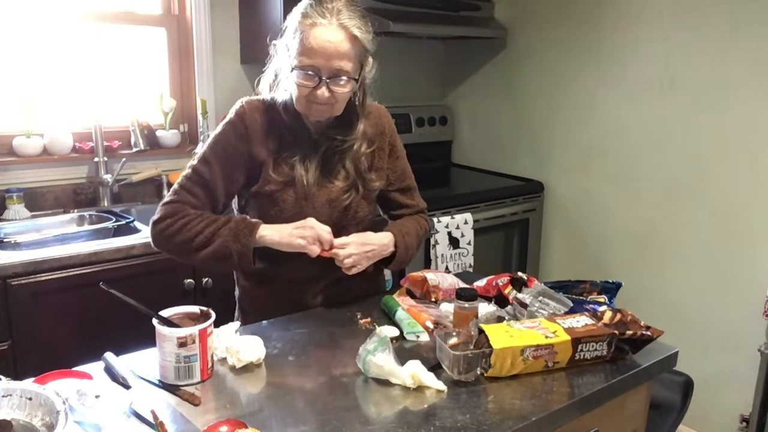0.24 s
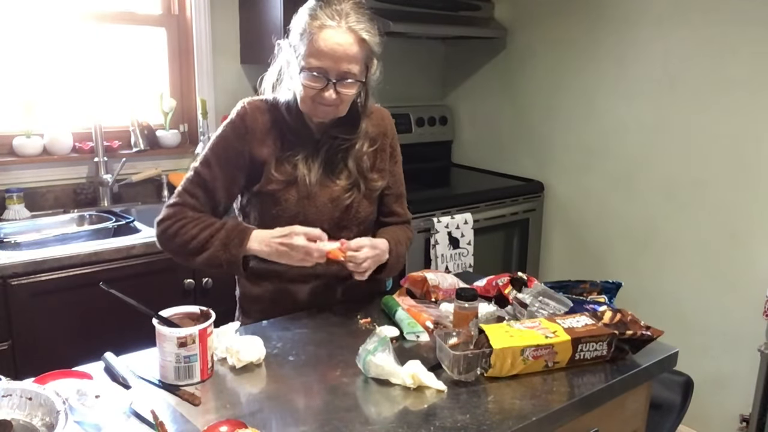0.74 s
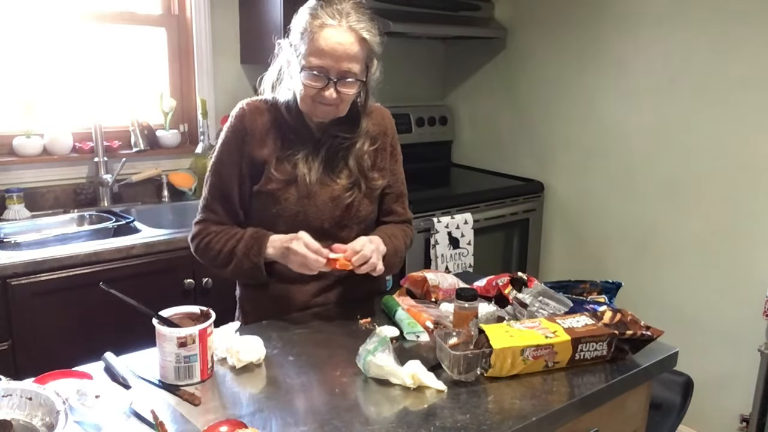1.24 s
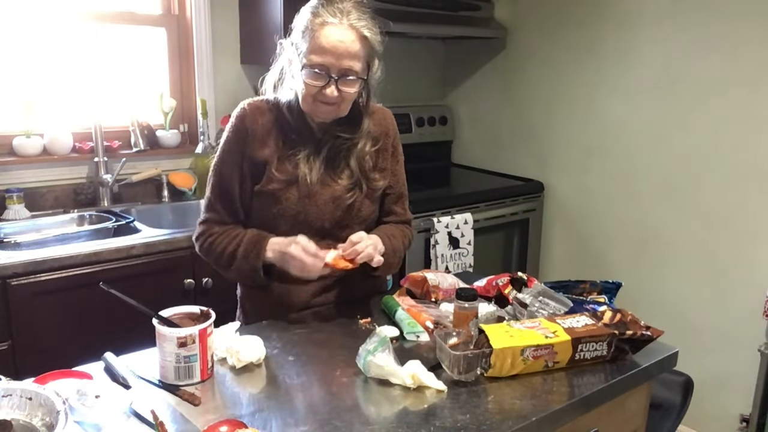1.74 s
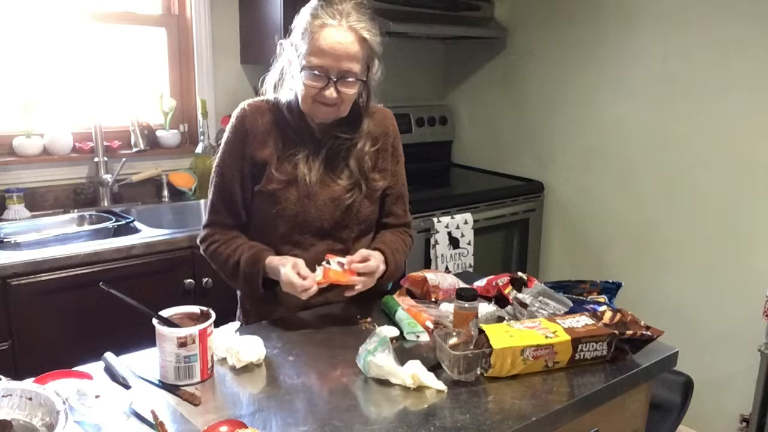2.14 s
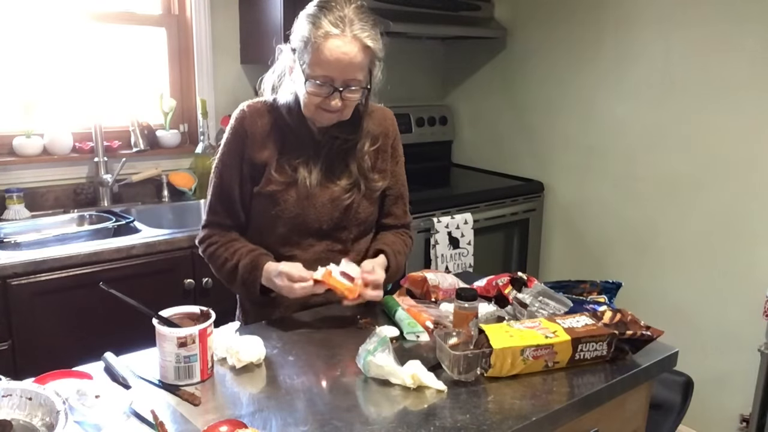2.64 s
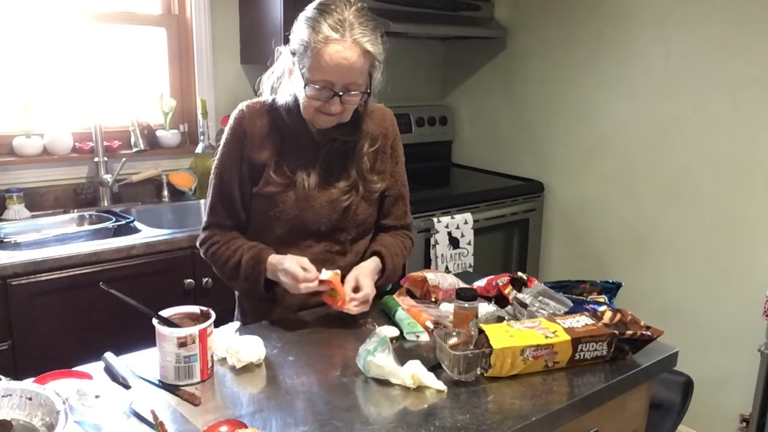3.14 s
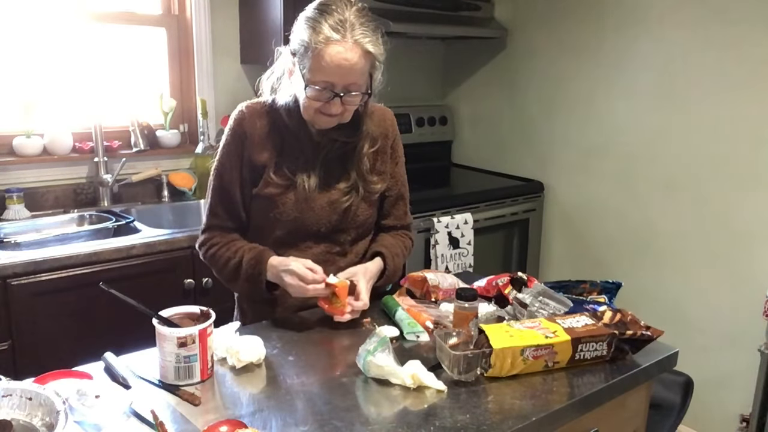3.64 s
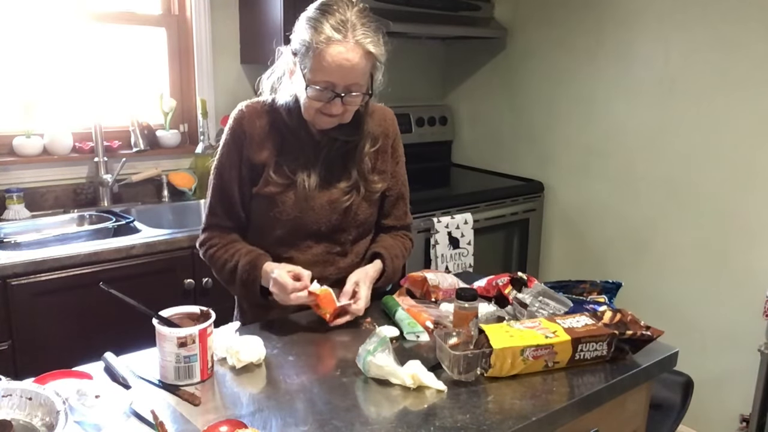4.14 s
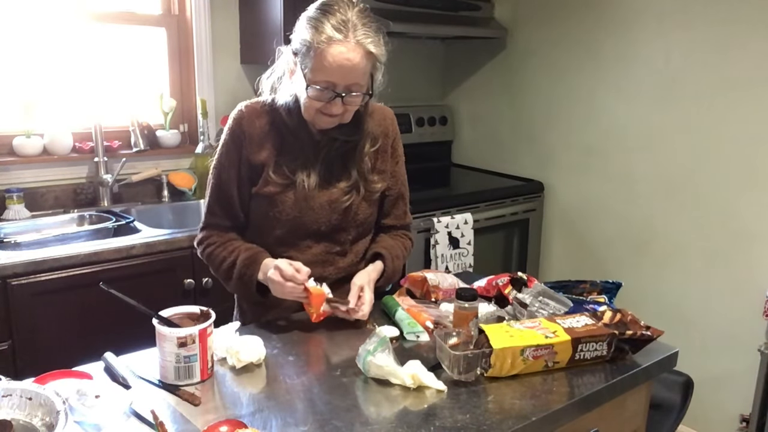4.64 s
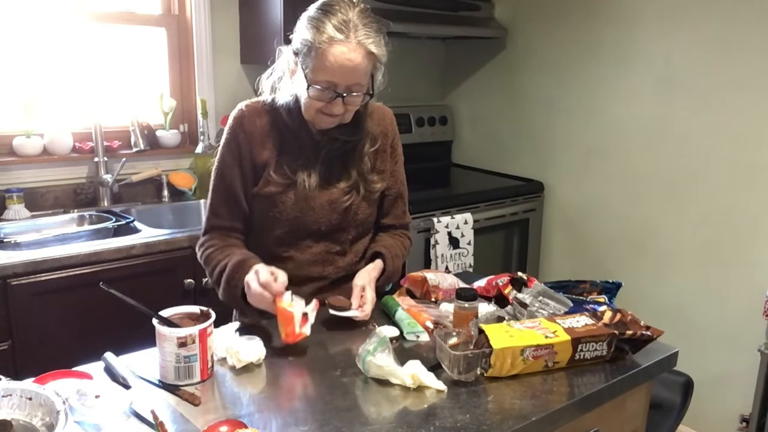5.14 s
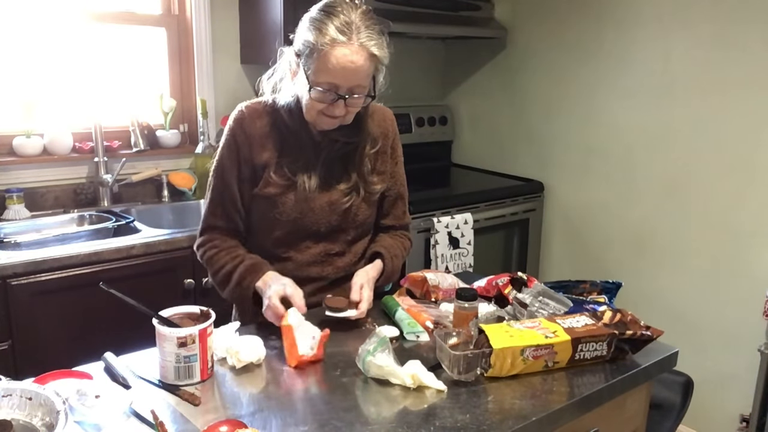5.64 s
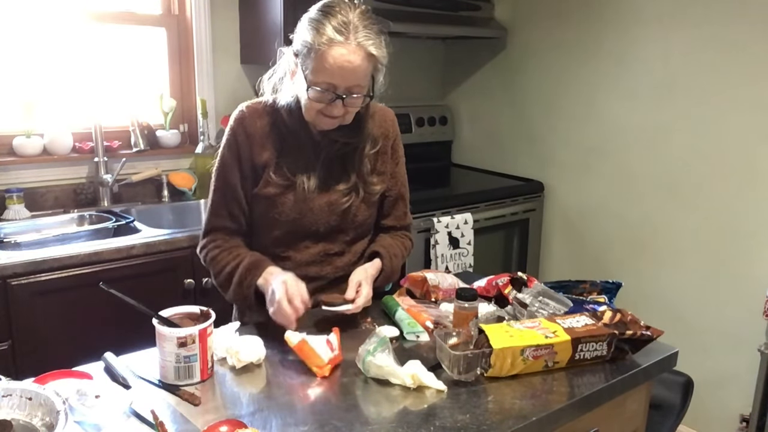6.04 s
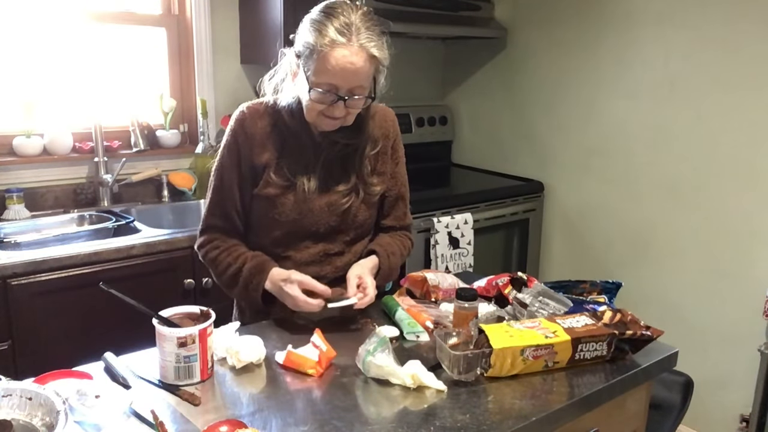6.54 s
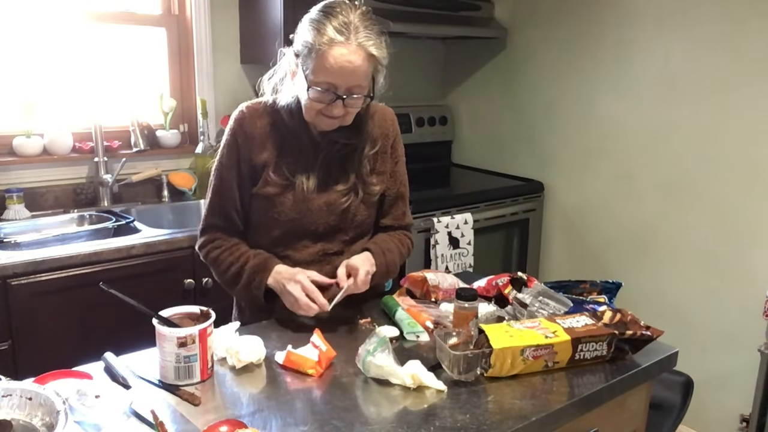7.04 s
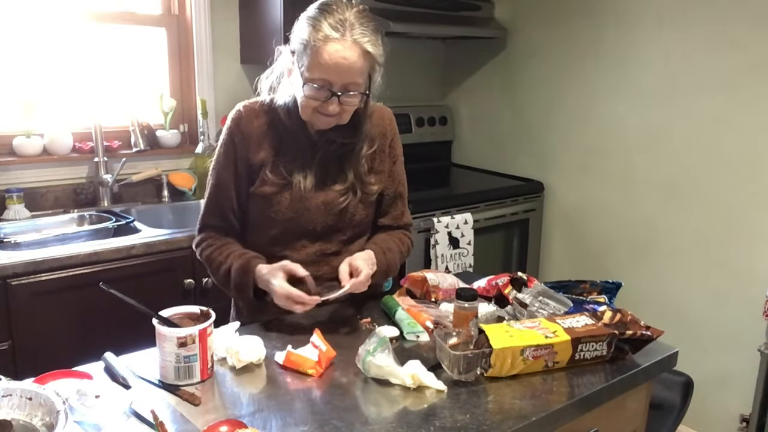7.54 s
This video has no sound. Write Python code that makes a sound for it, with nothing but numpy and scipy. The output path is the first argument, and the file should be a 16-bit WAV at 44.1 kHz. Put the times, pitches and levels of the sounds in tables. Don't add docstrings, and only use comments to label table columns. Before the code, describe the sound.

In a quiet, hard-surfaced kitchen, hands work a thin plastic wrapper over a stone counter. From 0 to 1 s, crisp irregular snaps over fine rustle bunch most tightly around 0.4-0.5 s. Tearing follows, with sharp ticks near 1.15 and 1.3, a very faint soft thump near 1.5, and the loudest crack at about 1.65 with a short dull knock. Unfolding brings dense crinkles at 2.0-2.1 and a stronger flurry at 2.2-2.4, then scattered snaps. From 3 to 4.7 s, picking and prying is softer, with finger rub, a barely audible squeak and wooden creak around 4, and small low knocks. After 4.8 s it thins to faint papery ticks with gaps, small touches near 5.3, 6.2 and 6.6, and a brighter crackle burst at 7.2-7.35 before fading. Short reflections, low fridge hum and faint hiss continue throughout.

```python
import sys
import numpy as np
from scipy import signal
from scipy.fft import rfft, irfft, next_fast_len
from scipy.io import wavfile
from scipy.ndimage import map_coordinates

SR = 44100
rng = np.random.default_rng(int(sys.argv[2]) if len(sys.argv) > 2 else 0)


def voltage_ratio(level):
    return 10 ** (np.asarray(level, float) / 20)


def pcm_store(signal):
    levels = np.round(np.clip(np.atleast_2d(signal), -1, 1) * 32767)
    wavfile.write(sys.argv[1], SR, levels.astype(np.int16).T)


N = 344068

# (time [s], level [dB], panel pitch [Hz], low flap [dB], sizzle [dB])
CREASE_SNAPS = [(0.0383, -46.5, 5210, -27, -4), (0.0594, -41.5, 4000, -4.5, -16),
                (0.0768, -43.5, 3200, -2.5, -22), (0.1569, -40, 6440, -18, -4), (0.2577, -43, 6780, -28, 0),
                (0.264, -37, 5060, -10, -15), (0.305, -47, 6780, -5, 0), (0.324, -48, 6780, -14, 7),
                (0.3417, -45, 6780, -19, 8.5), (0.353, -44, 4030, -17, -12), (0.3686, -44, 3140, -16, -10),
                (0.38, -28, 4050, -31, -12), (0.3936, -34.5, 3600, -10, -16), (0.409, -42, 4280, -19, -9.5),
                (0.4288, -30, 3880, -8.5, -4.5), (0.4354, -37, 6120, -5, -4), (0.444, -49, 6780, -6, -5),
                (0.4633, -34, 6840, -27, -5), (0.4797, -27.5, 5340, -19, -5), (0.4874, -28.5, 3760, -24, -11),
                (0.5381, -47, 3360, -1.5, -14), (0.6568, -34.5, 4130, -14, -2.5), (0.67, -37, 2530, -15, -7),
                (0.704, -34.5, 4000, -12.5, -17), (0.7324, -41.5, 3060, -20, -1), (0.7471, -49, 2780, -14, 0),
                (0.8569, -44.5, 3530, -2.5, -12), (0.8938, -53, 6480, -18, -12), (0.9176, -41, 6650, -34, 6),
                (0.92, -51, 5230, -23, -2), (0.9276, -43.5, 2960, -14, -3), (0.9906, -36.5, 5320, -36, -6),
                (1.003, -39.5, 3430, -22, -11), (1.041, -46.5, 3700, -19, -16), (1.069, -45.5, 6460, -21, -7),
                (1.0824, -48, 3680, -21, 1),
                (1.1409, -26.5, 4090, -37, -6.5), (1.152, -46, 4390, -28, -1), (1.1555, -49, 4500, -32, -12),
              (1.1855, -35, 6780, -21, -7), (1.197, -43, 6780, -24, -2), (1.2613, -46, 3230, -10.5, -15),
              (1.2819, -25.5, 4130, -25, -19), (1.2935, -45, 3850, -25, -11),
              (1.3413, -41, 5280, -17, -12.5), (1.3614, -32, 3230, -11, -0.5),
              (1.3808, -31, 6780, -16, -1.5), (1.3918, -39.5, 4240, -11.5, 0), (1.421, -50, 3210, -19, -8),
              (1.433, -38.5, 4310, -26.5, -3.5), (1.4548, -40, 6780, -25, -1),
              (1.5199, -35, 3170, -13.5, -5), (1.5246, -36.5, 5190, -28, 4), (1.5568, -39, 5940, -30, -7.5),
              (1.56, -41, 5730, -25, -8), (1.565, -38.5, 6370, -29.5, -1),
              (1.6132, -40.5, 5280, -15, -11.5), (1.6266, -41, 4260, -28, -11.5),
              (1.6452, -12, 3340, -16.5, -11.5), (1.6557, -35, 3920, -6, -8), (1.6695, -39, 3320, -22, 5),
              (1.6932, -30, 3750, -29, -9), (1.701, -32, 3700, -21, -15), (1.7141, -26.5, 3380, -19, -19),
              (1.8306, -35, 3320, -27, -37), (1.8547, -41, 3290, -19, -7), (1.879, -37.5, 5120, -24, -15),
              (1.9063, -45.5, 6330, -13, -9),
                (1.9688, -59, 5680, -17, 1), (1.9925, -36.5, 3570, -27, -17.5),
                (1.9958, -33.5, 5320, -16, -12), (2.003, -28.5, 4030, -25, -12),
                (2.0356, -29.5, 4270, -14.5, -5), (2.0403, -31.5, 7000, -19, -1.5),
                (2.0441, -38, 4220, -25, -8.5), (2.0515, -37.5, 3320, -14, 1),
                (2.0653, -35, 3270, -7.5, -9.5), (2.0743, -34.5, 3190, -14, -1),
                (2.178, -56, 3190, -11, -12), (2.199, -58, 5880, -10, -3), (2.2064, -57, 6570, -10, 0),
                (2.212, -46, 5450, -17, -12), (2.2256, -31.5, 4080, -25, -9),
                (2.2296, -21.5, 4230, -21, -4.5), (2.236, -25, 5280, -26, 0), (2.2456, -29.5, 3450, -10, 1),
                (2.2562, -29, 3170, -21, -5), (2.2602, -29.5, 4090, -20, -14),
                (2.2774, -33.5, 3170, -15, -13.5), (2.324, -28, 3630, -23, -5.5),
                (2.337, -42.5, 4050, -25, -11), (2.3632, -37, 6300, -26, -10), (2.401, -38, 3320, -12, -16),
                (2.4111, -32.5, 4330, -17, -30), (2.421, -44, 4220, -8, -12), (2.548, -46, 5160, -28, -5),
                (2.5632, -46, 6780, -12, -7), (2.5712, -50, 5400, -22, -3), (2.596, -28, 4940, -31, -13),
                (2.6064, -49, 4410, -14, -10), (2.6338, -48, 4200, -18, -16),
                (2.6573, -39.5, 4050, -8, -24), (2.665, -40, 3470, -13, -23), (2.668, -41, 3510, -18, -19),
                (2.8606, -51, 6780, -3, -1), (2.8873, -35, 4200, -6, -6.5), (2.8883, -41, 4060, -27, -1),
                (2.8983, -46, 3730, -14, 2),
                (3.056, -40.5, 3940, -10.5, -2.5), (3.107, -45, 3250, -13, -15),
              (3.1208, -41, 2600, -3.5, -15), (3.137, -40, 6050, -19, -10), (3.1588, -42, 3010, -9, -7),
              (3.178, -42, 5470, -15, -4), (3.2123, -50, 6680, -19, 4), (3.2505, -43.5, 6860, -13, -5),
              (3.2957, -57, 3270, -22, 9), (3.3046, -58, 6780, -22, 8), (3.3383, -55, 6780, -24, 6),
              (3.3486, -42, 4370, -18, -1), (3.391, -44, 3250, -11, 0), (3.3938, -45.5, 4100, -4, -5),
              (3.3987, -38.5, 3400, -19, -19), (3.4321, -45.5, 3600, -4, -14),
              (3.5367, -36.5, 2980, -30, -4.5), (3.5396, -39, 4140, -33, -18),
              (3.5527, -40.5, 4580, -31, -16), (3.588, -39.5, 6780, -15, -11), (3.6015, -42, 6780, -15, -5),
              (3.6122, -32.5, 5100, -8.5, -10), (3.684, -38, 6780, -7.5, -7), (3.6906, -42, 6400, -6.5, 1),
              (3.6943, -45, 3100, -4, -6), (3.803, -37.5, 3040, -29, 0), (3.813, -48, 3000, -23, -1),
              (3.8459, -42, 3200, -23, -16),
                (3.878, -47, 3080, -17, -14), (3.903, -46, 4090, -8, -6), (3.9238, -38, 6630, -7, -5),
             (3.941, -48, 5060, -14, -8), (4.0255, -44.5, 2610, -4, -17), (4.0665, -49, 2950, -5.5, -14),
             (4.138, -42.5, 4030, -24, -11), (4.143, -44, 3980, -20, -11), (4.194, -41.5, 5170, -9, 3),
             (4.2049, -52, 5210, -8, -5), (4.287, -35.5, 2540, -17.5, -6.5), (4.29, -47, 3270, -16, -11),
             (4.2967, -51, 3620, -14, -8), (4.3895, -61, 5190, -19, -4), (4.4048, -41.5, 2970, -26, -10),
             (4.4195, -50, 6440, -18, -9), (4.436, -53, 2610, -10, -3), (4.481, -43, 2950, -9, -12),
             (4.4933, -62, 5620, -12, -13), (4.52, -50, 5210, -9, -1), (4.5349, -57, 6780, -15, 0),
             (4.541, -50, 5060, -15, 1), (4.5724, -36, 6780, -13, 3.5), (4.5827, -42, 6780, -7, 1),
             (4.612, -58, 6780, -10, -1), (4.629, -42, 2610, -1, 0), (4.633, -32, 2970, -10.5, -1),
             (4.6514, -45, 2600, -20, -3),
                (4.759, -51, 5120, -14, -10), (4.851, -44, 5400, -20, -8), (4.8593, -49, 3140, -10, 2),
              (5.0776, -53.5, 6780, -5, -8), (5.1788, -58, 4260, -17, 4.5), (5.2125, -57, 4180, -5, -10),
              (5.2502, -47, 4390, 1, -4), (5.2583, -36, 4100, -22, -24), (5.2724, -41, 3800, -26, -22),
              (5.356, -42.5, 2950, -1.5, -11), (5.3745, -50, 2910, -3, -15),
              (5.5471, -42.5, 6700, -15, -6.5), (5.662, -45, 4220, -12, -6.5),
              (6.1593, -42.5, 5030, -24.5, 0), (6.1627, -56, 6460, -14, -2), (6.1698, -53.5, 4590, -14, 5),
              (6.3262, -60, 6780, -13, -4), (6.4006, -56, 6370, -11, 3), (6.4104, -56, 2860, -8, 2),
              (6.4525, -44, 6780, -23, -0.5), (6.4562, -54, 6240, -15, 2), (6.4635, -60, 6780, -6, -2),
              (6.5836, -55, 6780, -8, -5), (6.6114, -37, 5500, -19, -2), (6.9548, -52.5, 6400, -13, 2),
              (7.0948, -49, 6360, -26, -7), (7.0985, -57, 6400, -14, -4), (7.12, -49, 5200, -15, -1),
              (7.155, -47.5, 3140, -26, -11), (7.1674, -35, 6100, -23, -11), (7.1768, -54, 6780, -20, -9),
              (7.267, -35.5, 3100, -11.5, -14), (7.2783, -37.5, 6330, -19, -8), (7.2818, -42, 2860, -16, 1),
              (7.3053, -31.5, 6100, -17.5, -3.5), (7.3149, -35, 4070, -20, -10),
              (7.3572, -46.5, 3250, -22, -11), (7.5213, -56, 4870, -22, -16), (7.6222, -59, 6260, -13, -5),
              (7.6348, -54, 6160, -16, -10),
                (4.53, -40.5, 2500, -4, -2),
    (4.569, -42, 2200, -4, -7),
    (2.5958, -32, 3570, -26, -25),
    (7.3053, -35, 3100, -10.5, -14),
    (.2627, -43, 3200, -2.5, -20),
    (6.8, -54, 4200, -10, 1),
    (7.5, -56.5, 5200, -15, -0.5),
]

# (peak time [s], crackle [dB], swell time [s], finger rub over crackle [dB])
PULLS = [(.07, -51, 0.17, -16), (.36, -39.5, 0.087, -19), (.48, -45.5, 0.34, -16.5), (.73, -53, 0.37, -18),
         (.93, -51.5, 0.068, -22), (1.15, -55, 0.87, -20), (1.38, -43.5, 0.21, -23),
         (1.52, -47, 0.096, -35), (1.66, -34.5, 0.038, -15.5), (2.0, -43.5, 0.022, -16),
         (2.06, -44.5, 0.1, -14), (2.25, -34.5, 0.036, -16.5), (2.61, -48, 0.055, -11),
         (2.9, -47.5, 0.12, -11.5), (3.13, -42, 0.071, -16.5), (3.41, -52, 0.2, -8.5),
         (3.62, -47, 0.083, -18), (3.77, -64, 0.81, -9.5), (3.94, -48, 0.4, -12.5), (4.1, -58, 0.78, -5.5),
         (4.3, -53.5, 0.42, -9.5), (4.425, -48, 0.065, -9), (4.485, -49.5, 0.15, -3.5),
         (4.58, -45, 0.085, -16), (4.86, -60, 0.11, -4.5)]
# (peak time [s], crackle [dB], swell time [s], finger rub over crackle [dB])
TOUCHES = [(5.27, -57, 0.033, -19), (5.33, -62.5, 0.21, -17), (5.38, -58, 0.087, -3.5),
           (5.56, -59, 0.14, -22), (5.66, -60, .2, -13), (5.75, -52.5, 0.072, -13),
           (6.17, -53, 0.016, -14.5), (6.35, -67, 0.23, -10), (6.47, -58.5, 0.18, -13),
           (6.62, -53.5, 0.072, -35), (6.77, -58.5, 0.11, -16), (6.96, -55.5, 0.061, -19),
           (7.18, -52.5, .07, -24), (7.315, -43.5, 0.04, -20), (7.37, -55.5, .08, -10),
           (7.56, -55.5, 0.1, -9), (7.635, -61, 0.047, -9), (7.77, -61, 0.067, -29)]
# (time [s], share [0-1])
PAPER_SHARE = [
    (0, 0.76),
    (5.5, 0.41),
    (5.7, 0.84),
    (7.8, 0.7),
]
# (frequency [Hz], level per Hz [dB])
FILM_TONE = [(700, -35), (1300, 1), (3500, -3), (5000, -2.5), (8000, -2.5), (12500, -18.5), (15500, -31)]
# (frequency [Hz], level per Hz [dB])
PAPER_TONE = [(700, -27), (2000, -6.5), (6000, -6), (11000, -4.5), (15500, -13.5)]
# (frequency [Hz], level per Hz [dB])
HAND_TONE = [(180, -18), (330, -5), (800, 0), (1500, -1.5), (2600, -13), (4500, -30)]
# (middle [s], half length [s], pitch [Hz], width [Hz], level [dB])
SQUEAK = (4.1, .09, 5150, 350, -67)

# (frequency [Hz], time to fall 60 dB [s])
KITCHEN_RING = [(200, 0.23), (2000, 0.21), (6000, 0.33), (14000, 0.26)]
# (delay [s], level [dB])
WALL_ECHOES = [(.0042, -15), (.0115, -16), (.016, -19), (.023, -19)]
# (delay [s], level [dB], spread as the hands move [share of delay])
COUNTER_BOUNCE = (.00091, -3, .015)

# (time [s], level [dB])
THUMP = [
    (1.41, -78),
    (1.465, -55),
    (1.52, -57),
    (1.62, -61),
    (1.75, -78),
]
# (time [s], pitch [Hz], level [dB])
CREAK = [
    (3.93, 276, -78),
    (3.968, 268, -59),
    (4.005, 270, -63),
    (4.07, 275, -65),
    (4.11, 280, -59),
    (4.2, 281, -65),
]
# (time [s], pitch [Hz], level [dB], time to fall 60 dB [s])
KNOCKS = [
    (1.46, 127, -55, 0.19),
    (4.013, 417, -48.5, 0.13),
    (4.022, 726, -49, 0.099),
    (4.055, 253, -38.5, 0.037),
    (4.571, 196, -49, 0.11),
    (1.646, 573, -31, 0.034),
    (1.649, 398, -42, 0.16),
    (2.074, 470, -44, 0.033),
]
# (frequency [Hz], level per Hz [dB])
AIR_TONE = [(24, -48), (40, -13.5), (158, -6.5), (213, -12), (452, -21), (802, -26), (956, -26),
            (1830, -26), (6230, -31.5), (6880, -28), (15700, -37)]
# (pitch [Hz], width [Hz], level [dB])
FRIDGE_HUM = [
    (155, 4, 0),
    (112, 16, -11),
    (75, 16, -11),
]


def snaps(count):
    events = CREASE_SNAPS
    start, db, hz, low_db, high_db = np.transpose(events)[:, :, None]
    t = np.arange(400) / SR

    def jerk(share, t60):
        aftershocks = rng.standard_normal((len(start), len(t))) * t / t60 * voltage_ratio(-60 * t / t60)
        return (t == t[16]) + share * aftershocks

    def same_energy(x):
        return x / np.linalg.norm(x, axis=1, keepdims=True)

    panel = filtered(jerk(2, 0.004), lambda f: resonance(f, hz, 1800) ** 2 + 0.45 * resonance(f, 4070, 3600))
    flap = filtered(jerk(1.5, 0.005), lambda f: resonance(f, 900, 2100) ** 2)
    sizzle = filtered(jerk(5, 0.0055), lambda f: resonance(f, 9000, 10000) ** 2)
    shapes = same_energy(panel)
    shapes = shapes + voltage_ratio(low_db + 7.5) * same_energy(flap)
    shapes = shapes + voltage_ratio(high_db + 4.5) * same_energy(sizzle)
    shapes = voltage_ratio(db + 12.5) * shapes
    out = np.zeros((count, N + len(t)))
    for k, shape in enumerate(shapes):
        first = round(start[k, 0] * SR)
        out[k % count, first:first + len(t)] += shape
    return out[:, :N]


def rustle():
    crackle_gain = effort(rest_db=-72)
    rub_gain = effort(rest_db=-75.5, fades=0.77, rub=0.98)
    share = np.clip(curves(PAPER_SHARE)[0], 0, 1)
    sizes = voltage_ratio(3.5 * np.minimum(rng.exponential(size=N), 2))
    ticks = (rng.random(N) < 1400 / SR) * sizes
    grains = signal.lfilter([1], [1, -0.93], ticks) * rng.standard_normal(N)
    clumps = voltage_ratio(2.6 * wobble(70))
    creases = (unit(grains) + 0.5 * rng.standard_normal(N)) * clumps
    film = toned(creases, FILM_TONE)
    paper = toned(creases, PAPER_TONE)
    hand = toned(rng.standard_normal(N) * voltage_ratio(4.5 * wobble(60)), HAND_TONE)
    crackle = (1 - share) * film + share * paper
    return voltage_ratio(-5) * crackle_gain * crackle + rub_gain * hand


def effort(rest_db, **how):
    pulls = strokes(PULLS, fade_db_per_s=123, **how)
    touches = strokes(TOUCHES, fade_db_per_s=300, **how)
    return np.sqrt(pulls + touches + voltage_ratio(2 * rest_db))


def strokes(rows, fade_db_per_s, fades=1, rub=0):
    peak, db, swell, rub_db = np.transpose(rows)[:, :, None]
    samples = np.arange(0, N + 63, 64)
    age = samples / SR - peak
    shape_db = np.where(age < 0, 19.5 * age / swell, -fades * fade_db_per_s * age)
    power = np.sum(voltage_ratio(2 * (db + rub * rub_db + shape_db)), axis=0)
    return np.interp(np.arange(N), samples, power)


def squeak():
    middle, half, hz, width_hz, db = SQUEAK
    hiss = unit(filtered(rng.standard_normal(N), lambda f: resonance(f, hz, width_hz) ** 2))
    return voltage_ratio(db) * np.exp(-((np.arange(N) / SR - middle) / half) ** 4) * hiss


def kitchen(rows, wet_db):
    count = len(rows)
    every = np.arange(count)
    hz, t, z = signal.stft(rng.standard_normal((count, SR // 2)), SR, nperseg=256)
    fading = voltage_ratio(-60 * t / along(KITCHEN_RING, hz)[:, None])
    tail = signal.istft(z * fading, SR, nperseg=256)[1]
    tail = tail * (1 - 0.7 * np.exp(-(np.arange(tail.shape[1]) / SR / 0.005) ** 3))
    answer = voltage_ratio(wet_db) * tail / np.linalg.norm(tail, axis=1, keepdims=True)
    answer[:, 0] = 1

    def moved(delay, spread):
        return np.round(delay * SR * (1 + spread * rng.standard_normal(count))).astype(int)

    delay, db, spread = COUNTER_BOUNCE
    bounce = moved(delay, spread)
    answer[every[:-1], bounce[:-1]] += voltage_ratio(db)
    answer[-1, bounce[-1]] += voltage_ratio(db - 17.5)
    for delay, db in WALL_ECHOES:
        answer[every, moved(delay, 0.072)] += voltage_ratio(db)
    return signal.fftconvolve(rows, answer, axes=1)[:, :N].sum(axis=0)


def furniture():
    t = np.arange(N) / SR

    def body(f):
        return resonance(f, 130, 150) ** 2 + 0.5 * resonance(f, 255, 40) ** 2 + 0.9 * resonance(f, 80, 45)

    thud = unit(filtered(rng.standard_normal(N), body))
    hz, db = curves(CREAK)
    sounding = np.clip(np.minimum(t - CREAK[0][0], CREAK[-1][0] - t) / 0.022, 0, 1)
    turns = np.cumsum(hz + 14 * wobble(60)) / SR
    creak = np.sin(2 * np.pi * turns) * voltage_ratio(db - 1 + 2.5 * wobble(40))
    out = voltage_ratio(curves(THUMP)[0]) * thud + sounding * creak
    for start, knock_hz, knock_db, t60 in KNOCKS:
        age = np.maximum(t - start, 0)
        loudness = voltage_ratio(knock_db - 60 * age / t60) * (1 - np.exp(-age / 0.0012))
        out = out + loudness * np.sin(2 * np.pi * knock_hz * age)
    return out


def room_tone():
    air = toned(rng.standard_normal(N), AIR_TONE)

    def motor(f):
        return sum(voltage_ratio(db) * resonance(f, hz, width) for hz, width, db in FRIDGE_HUM)

    hum = unit(filtered(rng.standard_normal(N), motor))
    return voltage_ratio(-66 + 0.7 * wobble(3)) * air + voltage_ratio(-70.5) * hum


def unit(x):
    return x / np.sqrt(np.mean(x ** 2) + 1e-20)


def along(points, hz):
    f, v = np.transpose(points)
    return np.interp(np.log(hz + 1), np.log(f + 1), v)


def curves(rows):
    s, *cols = np.transpose(rows)
    return [np.interp(np.arange(N) / SR, s, c) for c in cols]


def wobble(rate):
    points = rng.standard_normal(int(N * rate / SR) + 4)
    return map_coordinates(points, [np.arange(N) * rate / SR])


def filtered(x, response):
    n = x.shape[-1]
    m = next_fast_len(n + min(n, SR // 2))
    return irfft(rfft(x, m) * response(np.fft.rfftfreq(m, 1 / SR)), m)[..., :n]


def toned(x, tone):
    return unit(filtered(x, lambda f: voltage_ratio(along(tone, f))))


def resonance(f, centre_hz, width_hz):
    return 1j * f * width_hz / (centre_hz ** 2 - f * f + 1j * f * width_hz)


def scene():
    wrapper = kitchen(np.vstack([snaps(count=12), rustle()]), wet_db=-4.5)
    return (wrapper + squeak() + furniture() + room_tone())[None]


def band_limit(x):
    return signal.sosfilt(signal.butter(12, 15850, fs=SR, output="sos"), x)


def record(dry):
    def microphone(f):
        edges = 1 / np.sqrt((1 + (56 / (f + 1)) ** 10) * (1 + (f / 15700) ** 50))
        presence = 1 + 0.5 * resonance(f, 3260, 2200)
        return edges * presence

    mix = filtered(dry, microphone)
    return band_limit(mix)


dry = scene()
out = record(dry)
pcm_store(out)
```